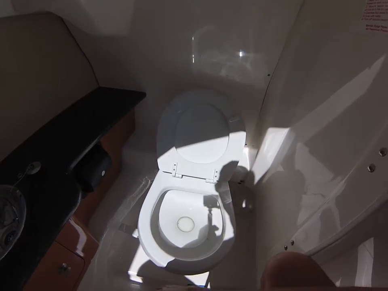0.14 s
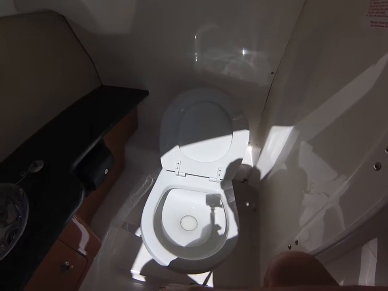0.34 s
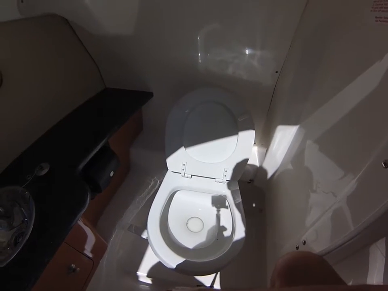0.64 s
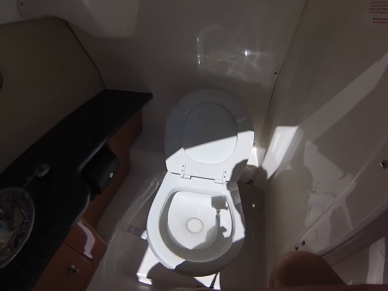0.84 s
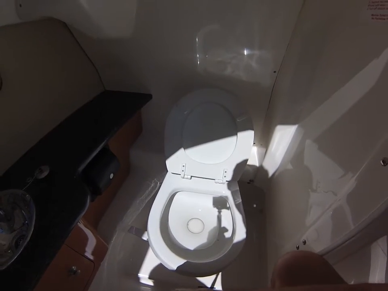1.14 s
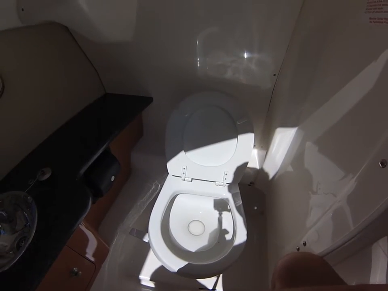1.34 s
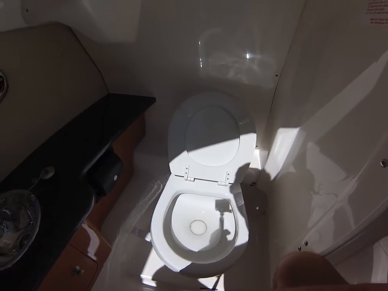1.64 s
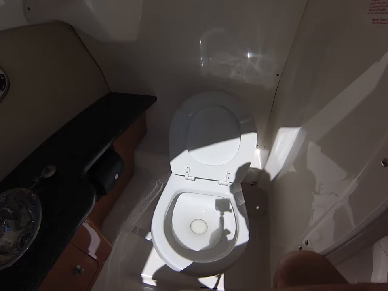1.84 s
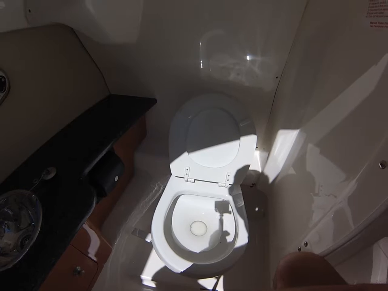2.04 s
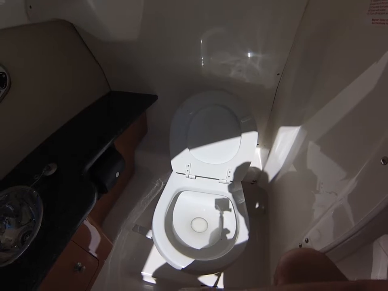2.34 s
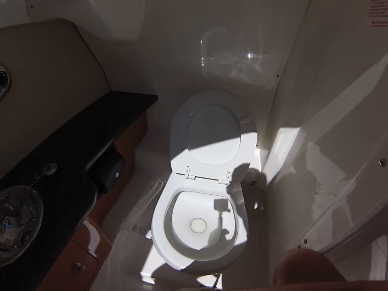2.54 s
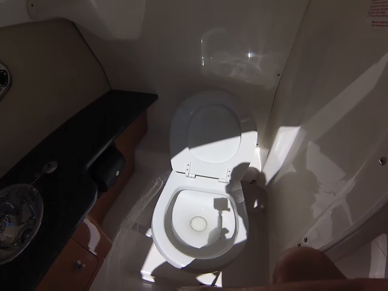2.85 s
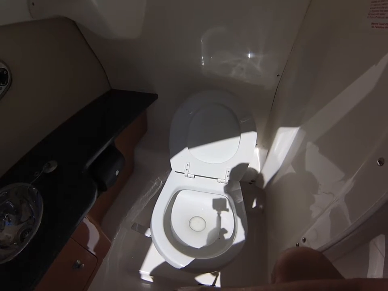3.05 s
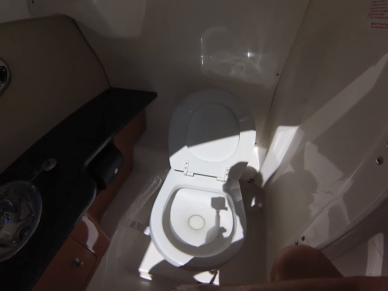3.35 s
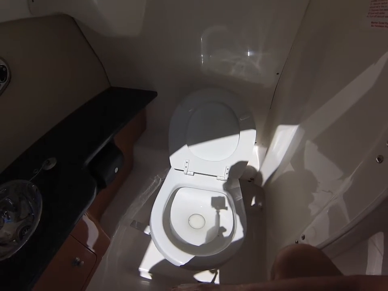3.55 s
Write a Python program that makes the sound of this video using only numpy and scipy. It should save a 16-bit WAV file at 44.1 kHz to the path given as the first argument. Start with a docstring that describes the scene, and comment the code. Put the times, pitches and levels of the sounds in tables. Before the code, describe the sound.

Deep, steady hum of an electric toilet pump in a cramped boat cabin.

```python
"""Pump in a boat's toilet cabin

A small electric pump fills the cramped cabin with a deep, nearly pure hum at twice its shaft speed.
Behind it a second, slower machine adds a thin whirr of steady lines, over low rumble, hiss,
soft puffs and faintly ringing panels. Once, the load eases and the pump speeds up briefly."""
import sys
import numpy as np
from scipy import signal
from scipy.fft import rfft, irfft
from scipy.io import wavfile
from scipy.ndimage import uniform_filter1d

SR = 44100
rng = np.random.default_rng(int(sys.argv[2]) if len(sys.argv) > 2 else 0)


def persist_wave(psi):
    """Save psi, clipped to +-1, as 16-bit WAV."""
    counts = np.round(np.clip(psi, -1, 1) * 32767).astype(np.int16)
    wavfile.write(sys.argv[1], SR, np.atleast_2d(counts).T)


N = 163170

# Tone colour of the cabin's rumble and hiss: frequency_hz, density_db (power per Hz)
CABIN_SPECTRUM = [(15, -68.5), (26, -66), (48, -65), (72, -67), (100, -78), (180, -79), (300, -83),
                  (500, -85), (800, -85.5), (980, -90), (1150, -90.5), (1600, -93.5), (2500, -98),
                  (3300, -99), (4000, -99), (4500, -98.5), (5200, -99.5), (5800, -99.5), (7000, -102),
                  (10200, -102.5), (10900, -101), (12000, -106), (12600, -111), (13100, -108),
                  (15000, -115)]
# Soft puffs of hiss: start_s, level_db (before the envelope), centre_hz
HISS_PUFFS = [(.745, -56, 1900), (.825, -54, 1500), (.9, -56, 1500), (1.2, -51.5, 3500), (1.3, -59, 3000),
              (1.38, -56, 3000), (1.465, -54, 2800), (1.56, -55, 3000), (1.945, -59, 3000),
              (2.6, -58, 5500), (2.93, -61, 4000), (3.08, -62, 3500), (3.105, -63, 3500)]
# Fuzzy panel tones: pitch_hz, resonator_width_hz, level_db
PANEL_TONES = [(332.4, 2.5, -70), (399.5, 8, -69), (784.6, 3, -71), (1135, 18, -74), (5689, 14, -84),
               (5872, 14, -87)]
# Whirr of the slower machine: shaft_multiple, level_db
WHIRR_HARMONICS = [(1, -55), (2, -59), (3, -62), (11, -74), (17, -76), (26, -76), (29, -73), (30, -74),
                   (35, -72), (36, -73.5), (37, -70), (38, -74), (43, -79), (46, -76), (47, -79), (49, -78),
                   (57, -80), (58, -76), (60, -77.5), (62, -82), (63, -79.5), (66, -83), (70, -78),
                   (73, -86), (75, -84), (77, -87), (82, -86), (108, -83), (112, -87), (139, -89),
                   (172, -89), (198, -89), (280, -91)]
# The pump's weaker harmonics:
# shaft_multiple, level_db (at mid-scene), slope_db_per_s, surge_change_db, waver_db
PUMP_HARMONICS = [(1, -51.7, -1.4, 5, 2), (3, -44.2, 0, 2.1, .8), (4, -44.3, .1, .6, .3),
                  (5, -53.4, 1.7, 2, .4), (6, -65, -1, -1.7, 2), (7, -57.5, .4, 0, .5),
                  (8, -60.5, 0, -5, .9), (9, -65, -4, -1.2, 1.5), (10, -65.5, 0, -1.8, .9),
                  (11, -68.3, -2.5, -11, 2.5), (14, -74, -1.6, 0, 3), (15, -56.4, -.7, -5.7, .5),
                  (16, -71, -3, 4, 2), (18, -73.8, 1.6, -9, 1.5), (20, -63.4, .9, 4.6, .9),
                  (22, -71.5, 0, -12, 2.5), (23, -64.3, .9, -.6, .6)]

PUMP_SHAFT_HZ, SECOND_SHAFT_HZ, SPEED_WAVER_HZ = 32.015, 24.15, 0.015
SURGE_PEAK_S, SURGE_RISE_S, SURGE_FALL_S, SURGE_HZ = 2.1, 0.17, 0.17, 0.33
HUM_DB, HUM_SLOPE_DB_PER_S, HUM_WAVER_DB = -16.5, 0.03, 0.11
DIP_S, DIP_WIDTH_S, DIP_DB = 2.17, 0.14, -0.8  # the hum weakens as the speed falls back


def amp(db):
    """Decibels to gain."""
    return 10 ** (np.asarray(db) / 20)


def unit_rms(x):
    """Scales a signal to rms 1."""
    return x / np.sqrt(np.mean(x ** 2) + 1e-20)


def drift(low_hz, top_hz, count=16):
    """A slow random modulator of rms 1, summed from sines between two rates."""
    t = np.arange(0, N + 256, 256) / SR
    rates = np.geomspace(low_hz, top_hz, count)[:, None]
    waves = np.sin(2 * np.pi * (rates * t + rng.random((count, 1)))) / np.sqrt(rates)
    return np.interp(np.arange(N) / SR, t, unit_rms(waves.sum(0)))


def tone(turns, db):
    """A sine at rms level db, its phase given in turns."""
    return np.sqrt(2) * amp(db) * np.cos(2 * np.pi * turns)


def resonate(x, hz, width_hz):
    """A single resonance with a gain of about 1 at its centre."""
    carrier = np.exp(2j * np.pi * hz * np.arange(len(x)) / SR)
    pole = np.exp(-np.pi * width_hz / SR)
    return 2 * (carrier * signal.lfilter([1 - pole], [1, -pole], x / carrier)).real


def cabin_noise(patch_db=0.73, flicker_db=0.5, swell_db=0.22):
    """The bed: rumble and hiss with drifting patches, a quick broad flicker and a slow swell."""
    def ripple(bins, frames):
        across_pitch = uniform_filter1d(rng.standard_normal(spectrogram.shape), bins, axis=0)
        return unit_rms(uniform_filter1d(across_pitch, frames, axis=1))

    _, _, spectrogram = signal.stft(rng.standard_normal(N + 4096), SR, nperseg=512)
    texture_db = patch_db * ripple(bins=10, frames=10) + flicker_db * ripple(bins=80, frames=4)
    _, noise = signal.istft(spectrogram * amp(texture_db), SR, nperseg=512)
    noise = unit_rms(noise[:N] * amp(swell_db * drift(0.32, 3.6)))
    hz, density_db = np.transpose(CABIN_SPECTRUM)
    colour_db = np.interp(np.log(np.fft.rfftfreq(N, 1 / SR) + 1), np.log(hz), density_db)
    return irfft(rfft(noise) * amp(colour_db) * np.sqrt(SR / 2), N)


def puffs(rise_s=0.007, fall_s=0.018, relative_width=0.82):
    """Soft breaths of broad hiss, each with a quick attack and a slower decay."""
    t = np.arange(SR // 5) / SR
    envelope = (1 - np.exp(-t / rise_s)) * np.exp(-t / fall_s)
    out = np.zeros(N)
    for start_s, db, hz in HISS_PUFFS:
        hiss = unit_rms(resonate(rng.standard_normal(len(t)), hz, relative_width * hz))
        out[round(start_s * SR):][:len(t)] += amp(db) * envelope * hiss
    return out


def panels():
    """Random vibration rings the panels into faint, fuzzy tones."""
    out = np.zeros(N)
    for hz, width_hz, db in PANEL_TONES:
        ring = resonate(rng.standard_normal(N), hz, width_hz)
        out += amp(db) * unit_rms(resonate(ring, hz, width_hz))  # a second pass steepens the skirts
    return out


def second_machine(waver_db=1.8):
    """A slower shaft whirrs in thin, steady harmonics, each wavering in level."""
    turns = np.cumsum(SECOND_SHAFT_HZ + SPEED_WAVER_HZ * drift(0.498, 4)) / SR
    return sum(tone(round(multiple) * turns + rng.random(), db + waver_db * drift(0.4, 4.3))
               for multiple, db in WHIRR_HARMONICS)


def pump(start_turns=0.2326):
    """The hum booms at twice the shaft speed; weaker harmonics ride the same surge as the load eases."""
    t = np.arange(N) / SR
    surge_width_s = np.where(t < SURGE_PEAK_S, SURGE_RISE_S, SURGE_FALL_S)
    surge = np.exp(-((t - SURGE_PEAK_S) / surge_width_s) ** 2)
    shaft_hz = PUMP_SHAFT_HZ + SURGE_HZ * surge + SPEED_WAVER_HZ * drift(2.7, 11)
    turns = start_turns + np.cumsum(shaft_hz) / SR
    dip = np.exp(-((t - DIP_S) / DIP_WIDTH_S) ** 2)
    hum_db = HUM_DB + HUM_SLOPE_DB_PER_S * t + DIP_DB * dip + HUM_WAVER_DB * drift(1.0, 11)
    out = tone(2 * turns, hum_db)
    from_middle_s = t - t[-1] / 2
    for multiple, db, db_per_s, surge_db, waver_db in PUMP_HARMONICS:
        phase = round(multiple) * turns + rng.random()
        level_db = db + db_per_s * from_middle_s + surge_db * surge + waver_db * drift(0.57, 3.07)
        out += tone(phase, level_db)
    return out


def scene():
    """A mono mix: the pump up front, the whirr and the cabin behind it."""
    return (pump() + second_machine() + panels() + cabin_noise() + puffs())[None]


def record(dry):
    """A steep low-pass takes off the very top of the hiss."""
    lowpass = signal.firwin(601, cutoff=15100, window=("kaiser", 9), fs=SR)
    padded = np.pad(dry, ((0, 0), (300, 300)), "edge")
    return signal.oaconvolve(padded, lowpass[None], "valid")


dry = scene()
out = record(dry)
persist_wave(out)
```